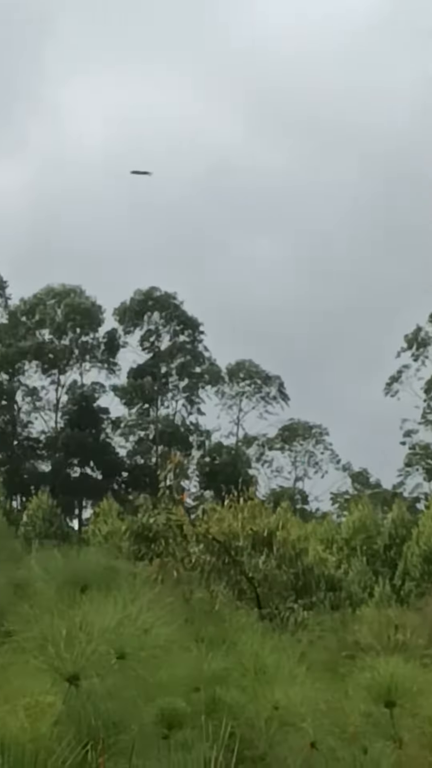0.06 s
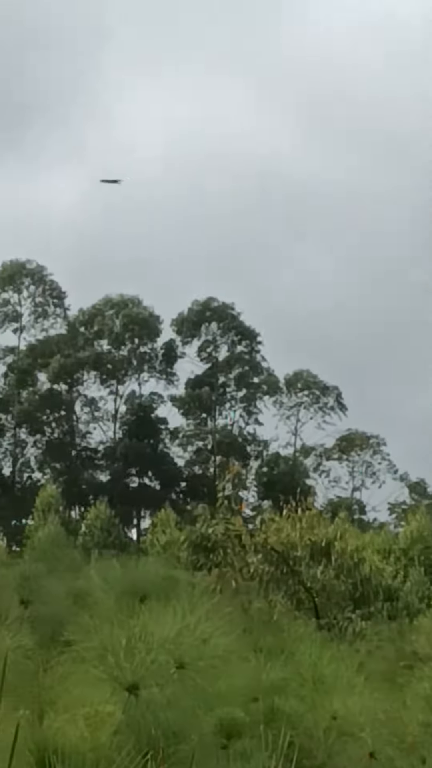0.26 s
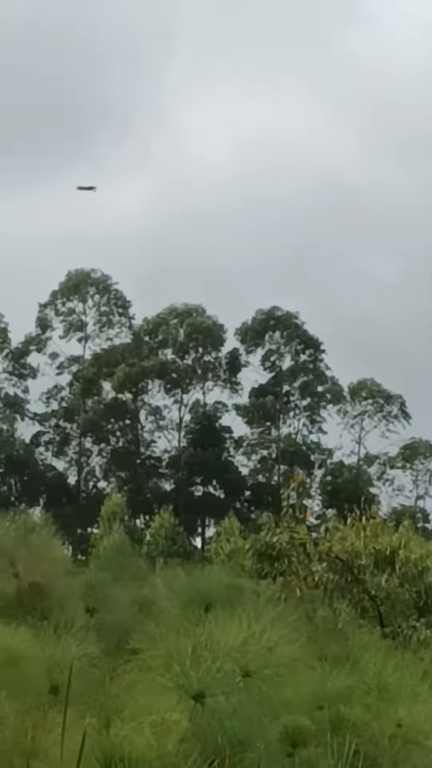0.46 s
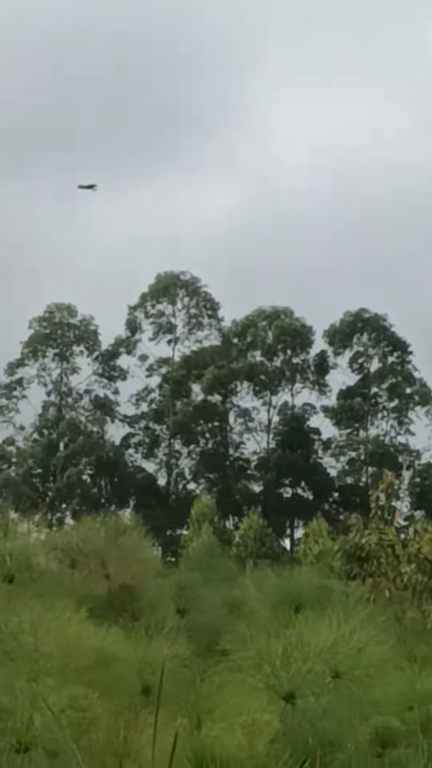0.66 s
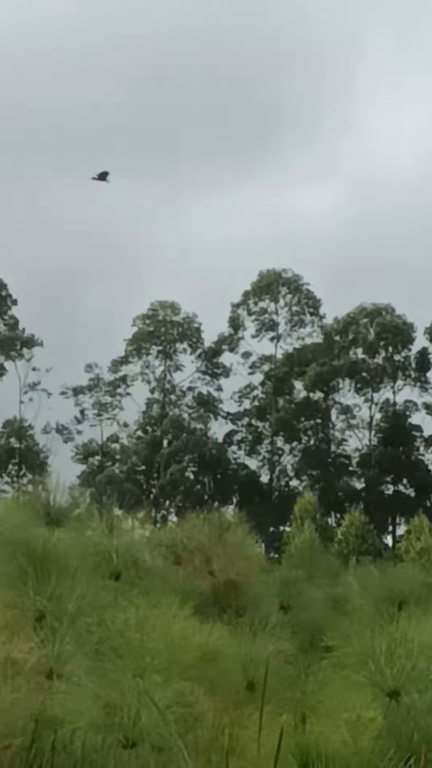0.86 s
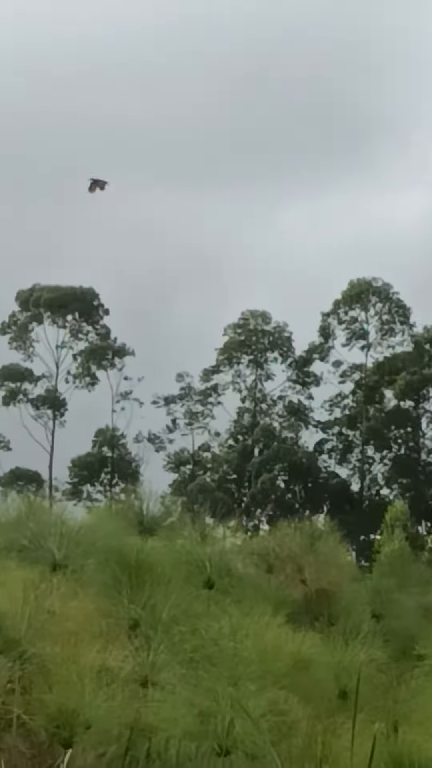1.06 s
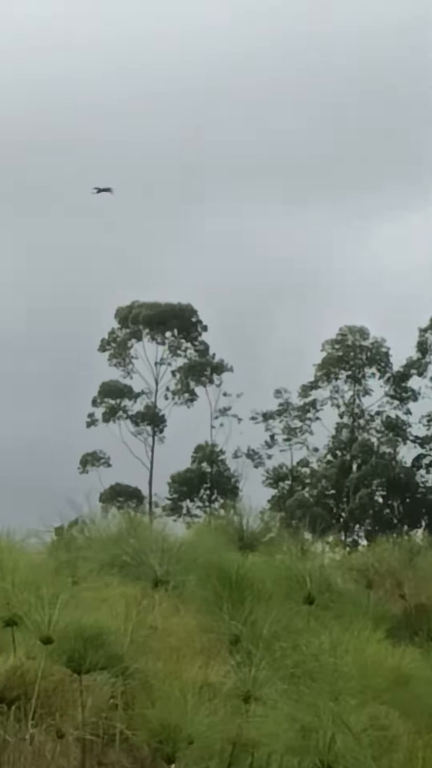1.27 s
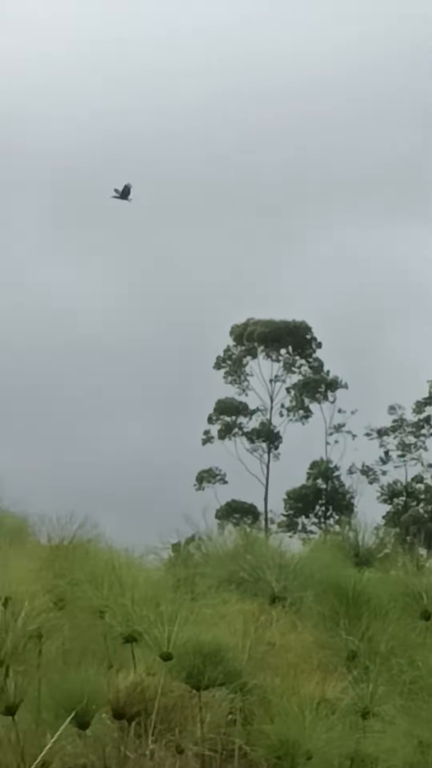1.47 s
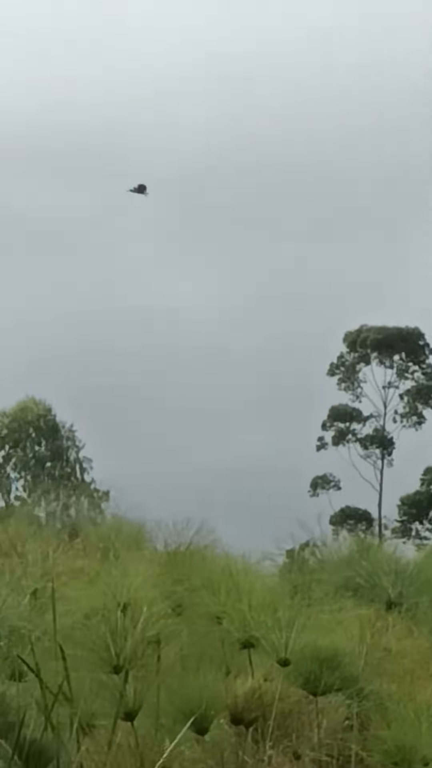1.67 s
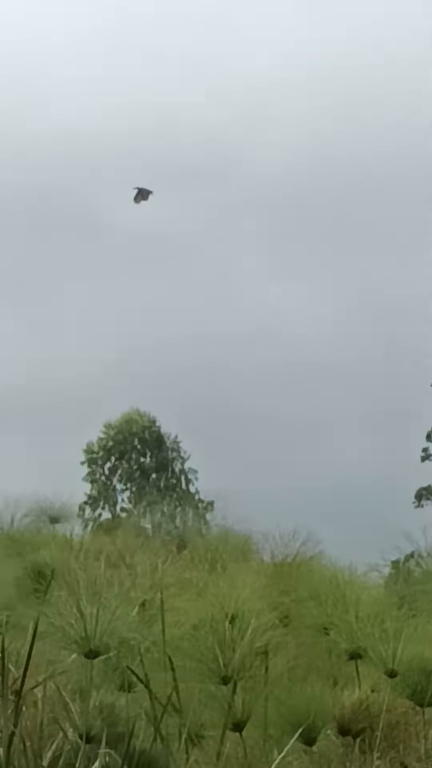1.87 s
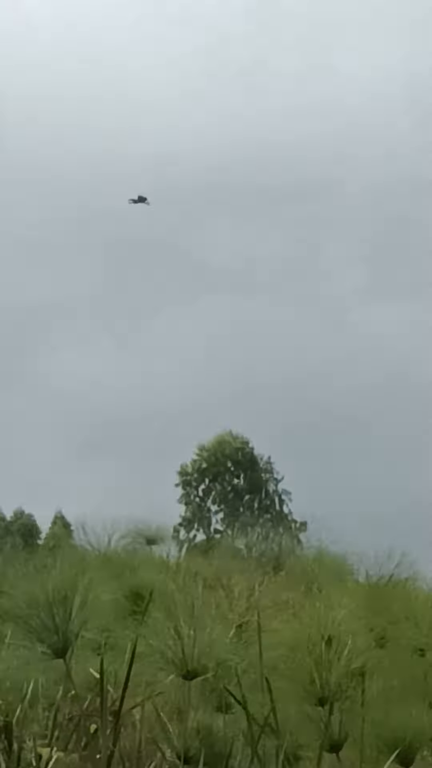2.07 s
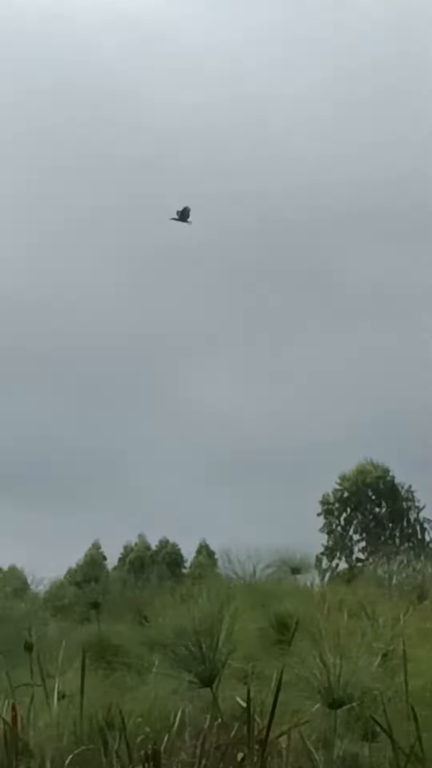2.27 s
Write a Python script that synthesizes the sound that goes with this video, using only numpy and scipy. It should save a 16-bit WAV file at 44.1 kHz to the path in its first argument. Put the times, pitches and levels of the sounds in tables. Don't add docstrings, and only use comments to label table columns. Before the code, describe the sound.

One honking, rasping bird cry sounds over open scrub and echoes dully off distant trees; cicadas buzz, crickets trill, sharp ticks come in runs, with soft leaf hiss and low wind rumble on a phone.

```python
import sys
import numpy as np
from scipy import signal
from scipy.fft import rfft, irfft, next_fast_len
from scipy.io import wavfile
from scipy.ndimage import uniform_filter1d

SR = 44100
rng = np.random.default_rng(int(sys.argv[2]) if len(sys.argv) > 2 else 0)


def pcm_store(signal):
    levels = np.round(np.clip(np.atleast_2d(signal), -1, 1) * 32767)
    wavfile.write(sys.argv[1], SR, levels.astype(np.int16).T)


def rack_gain(trim_db):
    fader = np.asarray(trim_db, float)
    return 10 ** (fader / 20)


N = 101430
SIDES = np.array([[.5], [-.5]])


def level(x, db):
    return x * rack_gain(db) / np.sqrt(np.mean(x ** 2))


def walk(rate_hz):
    k = int(SR / rate_hz)
    steps = np.repeat(rng.standard_normal(N // k + 1), k)
    return 1.3 * uniform_filter1d(uniform_filter1d(steps, k), k)[:N]


def flicker(rate_hz):
    w = walk(rate_hz)
    return w - uniform_filter1d(w, SR // 6)


def shaped(x, gain):
    n = next_fast_len(N)
    f_hz = np.arange(n // 2 + 1) * SR / n + 1
    return irfft(rfft(x, n) * gain(f_hz), n)[..., :N]


def colour(points):
    p = np.array(points)
    return lambda f: rack_gain(np.interp(np.log(f), np.log(p[:, 0]), p[:, 1], left=-90))


def hump(hz, width_hz):
    return lambda f: 1 / (1 + ((f - hz) / width_hz * 2) ** 2)


def pair(x, alike, other):
    a = np.clip(alike, 0, 1)
    return np.array([x, a * x + np.sqrt(1 - a * a) * other])


def leaf_hiss():
    # f/Hz, density/dB
    hiss_points = [(88, -14), (150, -9.5), (631, -11.5), (1980, -18), (2600, -18.5), (4560, -16.5),
                   (5440, -5.5), (8660, -20), (15500, -30)]
    hiss = level(shaped(rng.standard_normal((2, N)), colour(hiss_points)), -58)
    hiss = hiss * rack_gain(.8 * walk(7.7))
    return pair(hiss[0], 0.33, hiss[1])


def wind_rumble():
    # f/Hz, density/dB
    rumble_points = [(12, -40), (20, -11), (59, -1.5), (89, -6), (167, -22), (250, -22.5), (320, -27),
                     (550, -120)]
    law = colour(list(rumble_points) + [(500, -76)])
    rumble = level(shaped(rng.standard_normal((2, N)), law), -56)
    rumble = rumble * rack_gain(0.9 * walk(4))
    return pair(rumble[0], 1, rumble[1])


def cicadas(t):
    low_hz, low_width_hz, low_db, fade_db_per_s = 5430, 880, -57, -1.13
    high_hz, high_width_hz, high_db = 7540, 1300, -65.5
    clicks_per_s = 1400
    clicks = (rng.random((2, N)) < clicks_per_s / SR) * rng.standard_normal((2, N))
    clicks = clicks + 0.16 * rng.standard_normal((2, N))
    low = level(shaped(clicks, lambda f: hump(low_hz, low_width_hz)(f) ** 1.6), low_db)
    low = low * rack_gain(fade_db_per_s * t + 2.1 * walk(18) + walk(54))
    high = level(shaped(rng.standard_normal((2, N)), hump(high_hz, high_width_hz)), high_db)
    both = low + high
    return pair(both[0], 0.2, both[1])


def ticks(t):
    # first pair t/s, pairs, level/dB
    tick_runs = [
        (-.0085, 5, -50),
        (.4975, 9, -51),
        (1.224, 6, -56),
        (1.780, 6, -56),
        (2.252, 2, -60),
    ]
    period_s, gap_s, length_s = .0408, .011, .006
    pitch_hz, fall_hz = 8270, 600
    out = np.zeros(N)
    for start_s, pairs, db in tick_runs:
        for k in range(2 * int(pairs)):
            tick_s = start_s + k // 2 * period_s + k % 2 * gap_s
            u = (t - tick_s) / length_s - .5
            turns = length_s * (pitch_hz * u - fall_hz * u * u / 2)
            tick_gain = rack_gain(db + 2.6 * rng.standard_normal())
            out += tick_gain * np.exp(-7 * u * u) * np.sin(2 * np.pi * turns)
    return out


def crickets(t):
    # start t/s, end t/s, f/Hz, pulse rate/Hz, level/dB
    cricket_trills = [
        (0., .25, 7300, 43, -66),
        (.9, 1.74, 7080, 42.8, -62),
        (1.3, 1.58, 7900, 43, -65),
        (1.7, 2.05, 7450, 46, -65),
        (2.02, 2.3, 7080, 43.5, -67),
        (2.0, 2.3, 7850, 36, -67),
    ]
    out = np.zeros(N)
    for start_s, end_s, hz, pulse_hz, db in cricket_trills:
        swell = np.clip(np.minimum(t - start_s, end_s - t) / .04, 0, 1) * rack_gain(db + 3 * walk(15))
        pulses = np.maximum(np.sin(2 * np.pi * pulse_hz * t) + 0.55, 0) ** 2.5
        out += swell * pulses * np.sin(2 * np.pi * np.cumsum(hz + 70 * walk(150)) / SR)
    return out


def throat(f, opening, closed):
    # f/Hz, width/Hz, level/dB, lift/dB per unit of bill opening
    resonances = [(500, 350, -19, 1), (760, 140, -28.5, -26.5), (1040, 133, -22.5, 1),
                  (1637, 354, 2.5, -1.5), (1984, 630, -9, 1), (2835, 330, -15.5, -0.5),
                  (3821, 330, -8.5, 4.5), (4613, 330, -9.5, 9), (5302, 780, -7.5, 0.5),
                  (6170, 290, -17, 11), (6950, 1110, -25, 3.5), (9620, 1600, -25, -1),
                  (11720, 930, -32, 10)]
    floor_db, low_boost_db = -59, 16
    peaks = sum(rack_gain(db + lift * opening) * hump(hz, width_hz * 1.5)(f) ** 2
                for hz, width_hz, db, lift in resonances)
    return (rack_gain(floor_db) + peaks) * rack_gain(low_boost_db * closed * hump(900, 900)(f))


def partials(t, pitch_hz, phase, opening, rasp):
    rate_hz, full_depth_db, ref_hz, sway_rad_per_db = 36, 4.5, 4200, .14
    live = slice(SR // 5, SR * 7 // 5)
    slow = slice(0, N, 64)
    shared = flicker(rate_hz)[slow]
    voice = np.zeros((2, N))
    for k in range(1, 33):
        depth_db = full_depth_db * np.tanh(k * 500 / ref_hz)
        own = flicker(rate_hz * (1 + k / 12))[slow]
        sides = flicker(12.34)[slow]
        tone = throat(k * pitch_hz[slow], opening[slow], rasp[slow] ** 3)
        for ch in range(2):
            side = sides * (1 - 2 * ch)
            gain = tone * rack_gain(depth_db * (.35 * shared + 0.83 * own + .5 * side))
            sway = np.interp(t[live], t[slow], sway_rad_per_db * depth_db * (own + side))
            wave = np.sin(k * phase[live] + sway + k * k * .7)
            voice[ch, live] += np.interp(t[live], t[slow], gain) * wave
    return voice


def breath(phase):
    puffs = rng.standard_normal((2, N)) * (1 + 0.64 * np.cos(phase))
    puffs = shaped(puffs, lambda f: throat(f, -0.31, 0.067) * (f / 1600) ** 0.73)
    return pair(puffs[0], 0.23, puffs[1]) / np.std(puffs)


def cry(t):
    # t/s, pitch f/Hz, effort level/dB, left-right/dB, breath level/dB, bill opening (about -1..1)
    course = [
        (.216, 364, -43, 3, -8, -0.27),
        (.269, 481, -33, 3.5, -6.5, 0.19),
        (0.312, 533.4, -34, 6, -31, 0.53),
        (0.377, 555.5, -28, 9.5, -17.5, -0.081),
        (0.513, 547.4, -29, 6.5, -34, 0.12),
        (.695, 514.7, -33, 7, -24.5, 0.53),
        (1.101, 474.6, -31.5, 4.5, -32.5, -1.2),
        (1.252, 439.6, -36.5, 3, -22, -0.62),
        (1.345, 332.4, -54, 2, -7, -0.76),
    ]
    # f/Hz, left-right/dB
    shading = [(60, 15.5), (700, 6.5), (1300, 16), (2400, 5), (8000, 10.5), (15000, -0.5)]
    key_s, key_hz, effort_db, lean_db, breath_db, bill = np.array(course).T
    start_s, end_s = key_s[0], key_s[-1]
    rasp_in_s, rasp_out_s, attack_s, release_s = .13, .2, .016, .011
    crack_s, crack_hz, crack_length_s = 1.15, 19, .0272
    jitter, rasp_jitter = .0007, .022
    wing_db, wing_hz, wing_up_s = 1, 6.94, .61

    rasp = np.sqrt(np.clip(1 - (t - start_s) / rasp_in_s, 0, 1))
    rasp = rasp + np.clip(1 - (end_s - t) / rasp_out_s, 0, 1)
    pitch_hz = uniform_filter1d(np.interp(t, key_s, key_hz), SR // 40)
    pitch_hz = pitch_hz - crack_hz * np.clip((t - crack_s) / crack_length_s, 0, 1)
    shaky_hz = pitch_hz * (1 + jitter * walk(60) + rasp_jitter * rasp * walk(250))
    phase = 2 * np.pi * np.cumsum(shaky_hz) / SR

    voice = partials(t, pitch_hz, phase, np.interp(t, key_s, bill), rasp)
    sound = voice + breath(phase) * rack_gain(np.interp(t, key_s, breath_db))
    edge = np.clip((t - start_s) / attack_s, 0, 1) * np.clip((end_s + release_s - t) / release_s, 0, 1)
    wings_db = wing_db * np.cos(2 * np.pi * wing_hz * (t - wing_up_s))
    gain = edge * rack_gain(np.interp(t, key_s, effort_db) - 1.5 + wings_db)
    sound = sound * gain * rack_gain((np.interp(t, key_s, lean_db) - 7) * SIDES)
    return shaped(sound, lambda f: colour(shading)(np.maximum(f, 70)) ** SIDES)


def scrub_scatter(t, bird):
    level_db, t60_s, low_hz = -4, .34, 2400
    u = t[:SR // 5]
    twigs = rng.standard_normal((2, len(u))) * (rng.random(len(u)) < .02)
    twigs = twigs * rack_gain(-60 * u / t60_s) * (u > .004)
    twigs = pair(twigs[0], 0.31, twigs[1])
    response = twigs * rack_gain(level_db) / np.sqrt(np.sum(twigs[0] ** 2))
    wet = signal.fftconvolve(bird, response, axes=1)[:, :N]
    return shaped(wet, lambda f: 1 / np.sqrt(1 + (low_hz / f) ** 2))


def tree_echoes(t, bird):
    # delay t/s, level/dB, smear/s
    tree_rows = [
        (.09, -19, 0.038),
        (.235, -30.5, 0.0069),
        (0.346, -30, 0.0055),
        (.6, -33, 0.1),
    ]
    scatter_db, t60_s, top_hz = -21.5, 3.05, 2800
    leaves = rng.standard_normal((2, N))
    leaves = pair(leaves[0], 0.6, leaves[1])
    tail = rack_gain(-60 * t / t60_s) * np.clip(t / 0.15, 0, 1)
    shape = rack_gain(scatter_db) * tail / np.sqrt(np.sum(tail ** 2))
    for delay_s, db, smear_s in tree_rows:
        shape = shape + rack_gain(db) * np.exp(-((t - delay_s) / smear_s) ** 2) / np.sqrt(smear_s * SR)
    wet = signal.fftconvolve(bird.mean(axis=0)[None], leaves * shape, axes=1)[:, :N]
    return shaped(wet, lambda f: 1 / np.sqrt(1 + (f / top_hz) ** 4))


def far_birds(t):
    # start t/s, length/s, f/Hz, sag/Hz, level/dB
    calls = [(1.855, .08, 3620, 20, -66), (2.265, .05, 3500, 20, -68), (.8, .07, 630, -20, -66),
             (.89, .08, 650, 35, -60), (.99, .1, 655, 60, -60), (1.35, .075, 690, 20, -63),
             (1.85, .08, 740, 20, -66), (1.96, .1, 720, 20, -70), (1.5, .045, 1750, 750, -60),
             (1.55, .055, 1100, -900, -60), (1.63, .045, 1900, 700, -58), (1.6, .04, 2300, 20, -66)]
    out = np.zeros(N)
    for start_s, length_s, hz, sag_hz, db in calls:
        swell = np.clip(np.minimum(t - start_s, start_s + length_s - t) / .012, 0, 1)
        sag = sag_hz * np.clip((t - start_s) / length_s, 0, 1) ** 2
        pitch_hz = hz * (1 + 0.0051 * walk(60)) - sag
        out += rack_gain(db) * swell * np.sin(2 * np.pi * np.cumsum(pitch_hz) / SR)
    return out


def scene():
    t = np.arange(N) / SR
    bird = cry(t)
    near = ticks(t) * rack_gain(6 * SIDES) + (crickets(t) + far_birds(t)) * rack_gain(3 * SIDES)
    around = tree_echoes(t, bird) + cicadas(t) + leaf_hiss() + wind_rumble()
    return bird + scrub_scatter(t, bird) + near + around * rack_gain(4 * SIDES)


def roll_off(x):
    return signal.sosfilt(signal.butter(12, 15730, fs=SR, output="sos"), x)


def record(dry):
    left_lag_samples = 41
    late = np.array([np.roll(dry[0], left_lag_samples), dry[1]])
    return roll_off(late)


dry = scene()
out = record(dry)
pcm_store(out)
```